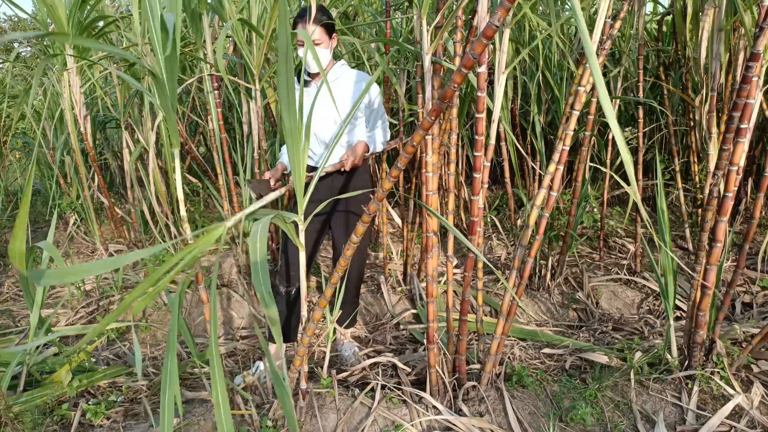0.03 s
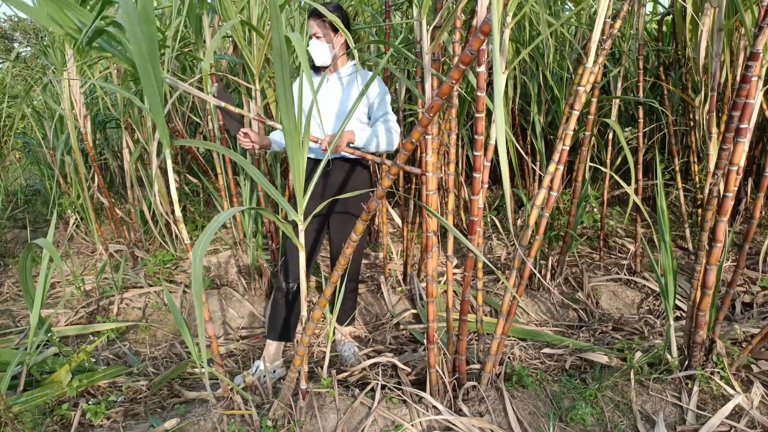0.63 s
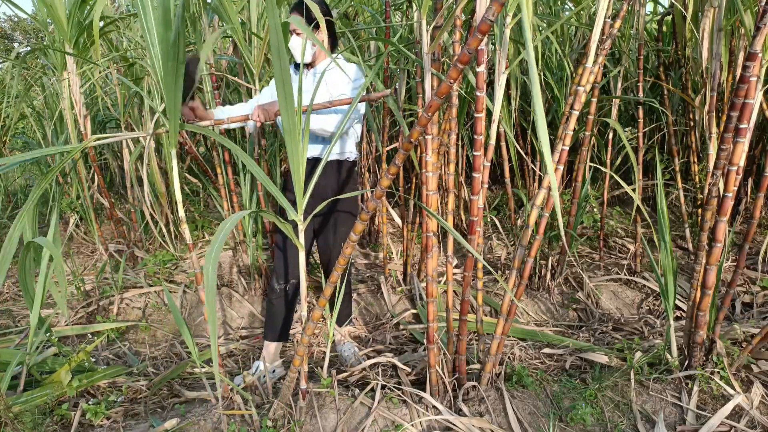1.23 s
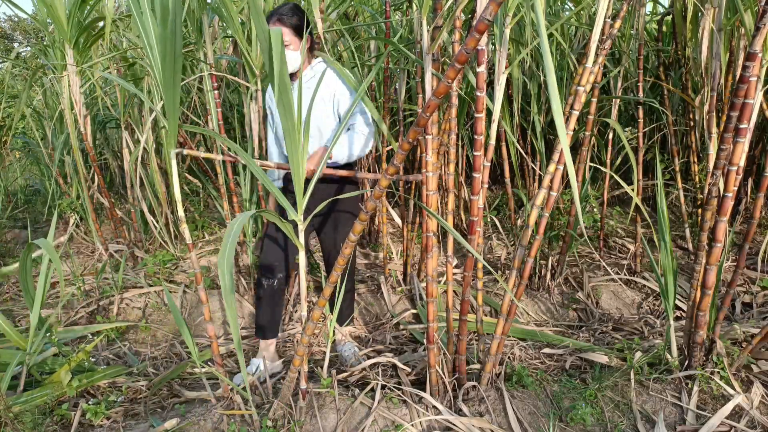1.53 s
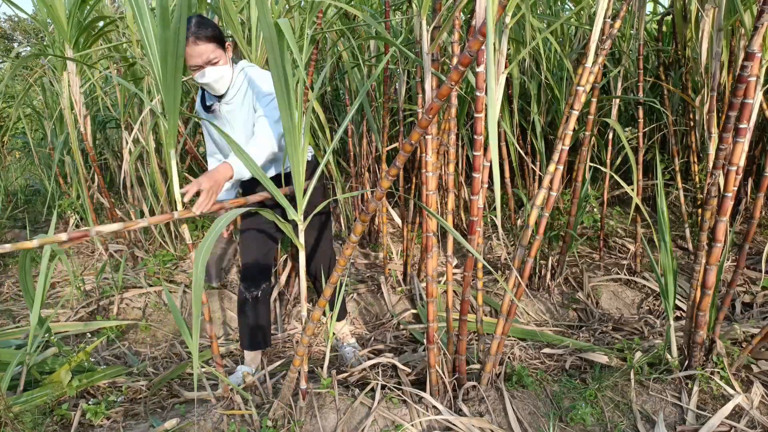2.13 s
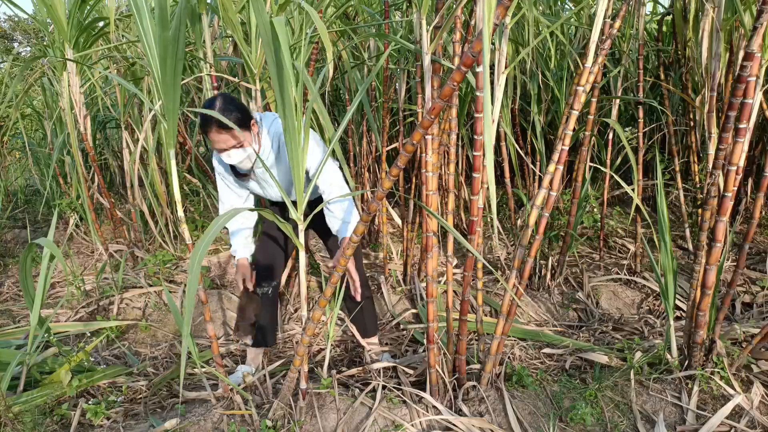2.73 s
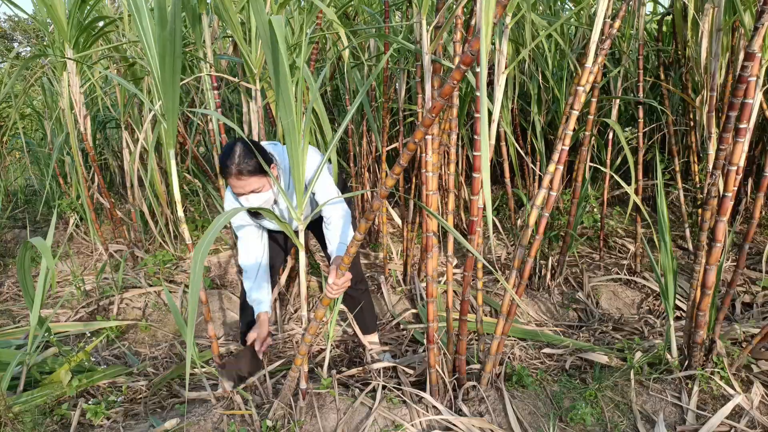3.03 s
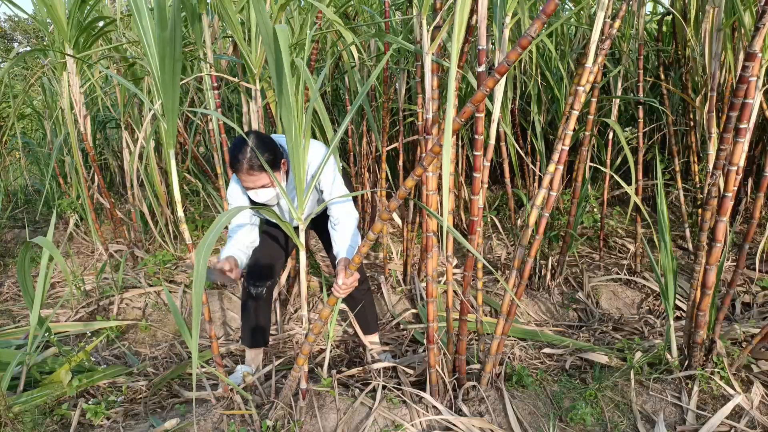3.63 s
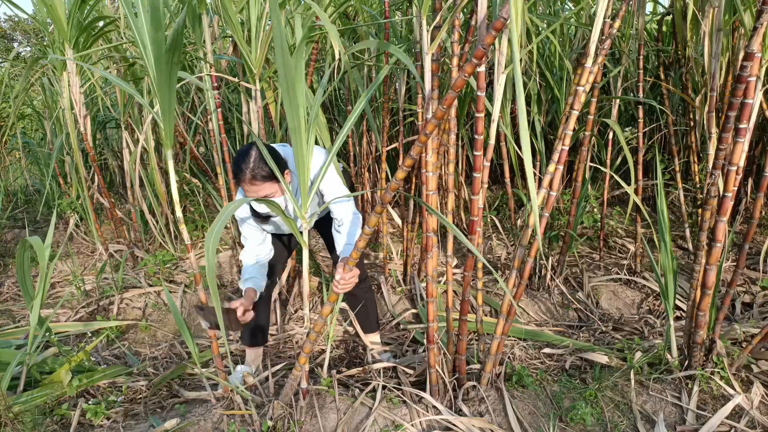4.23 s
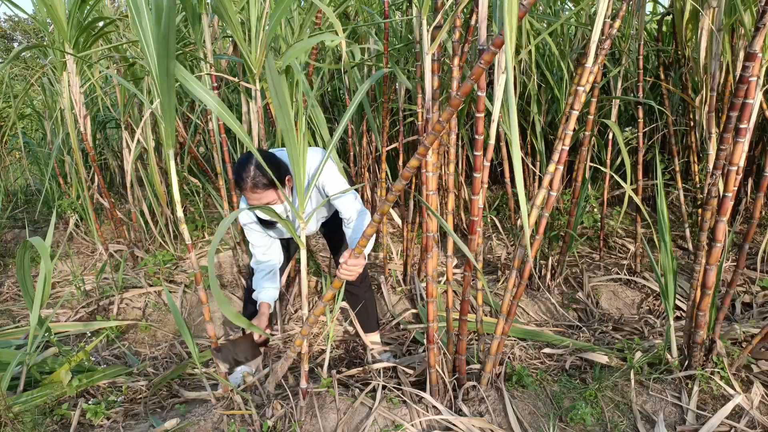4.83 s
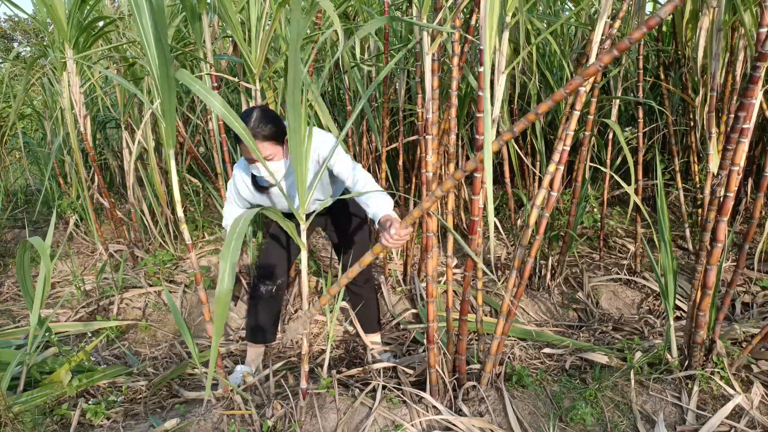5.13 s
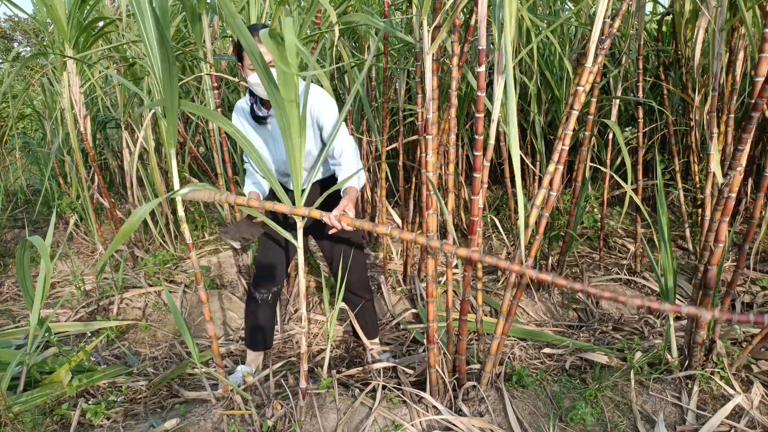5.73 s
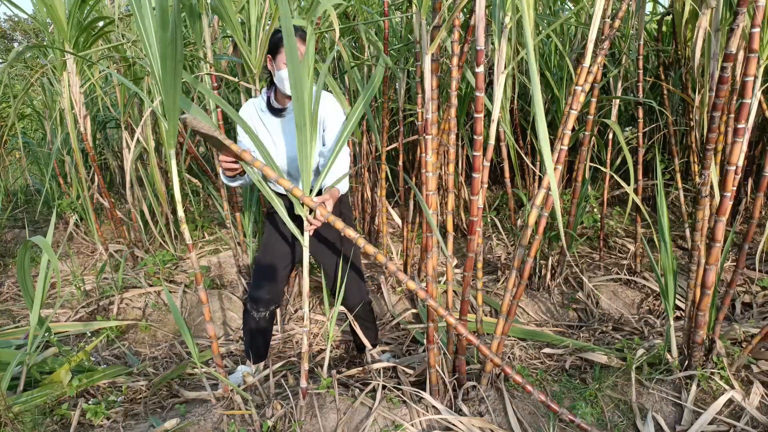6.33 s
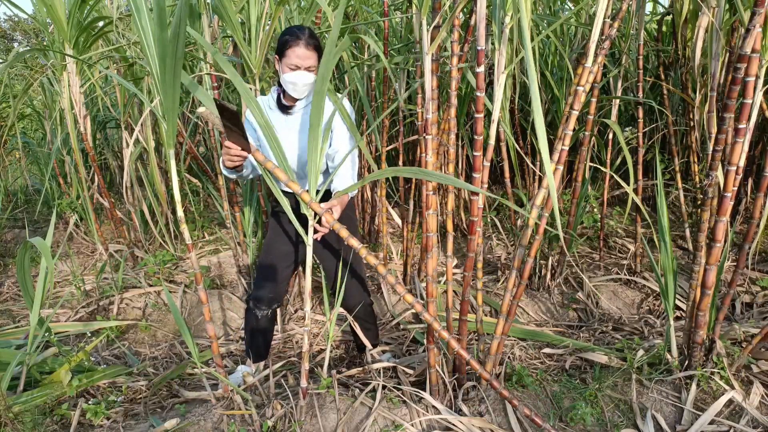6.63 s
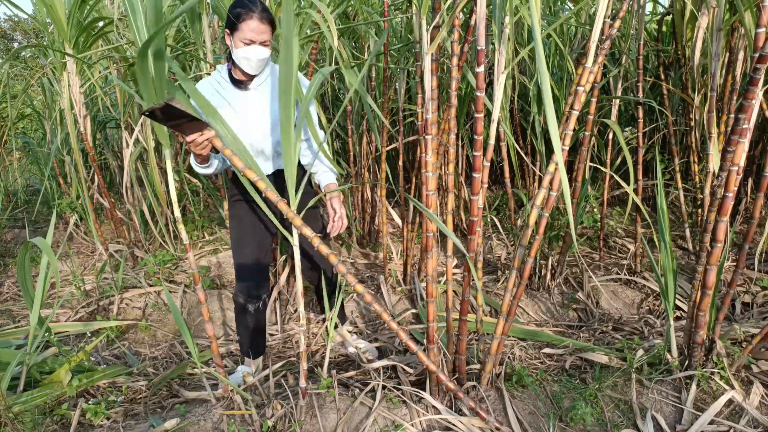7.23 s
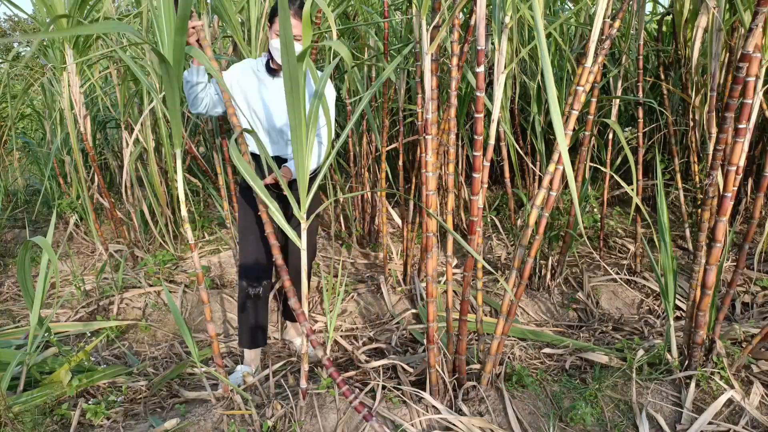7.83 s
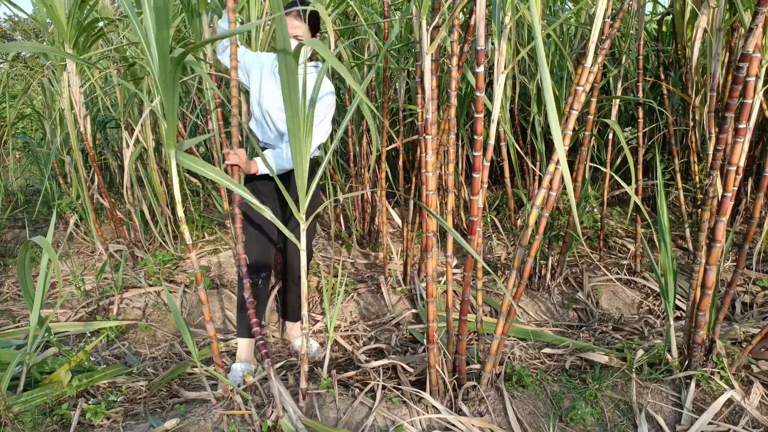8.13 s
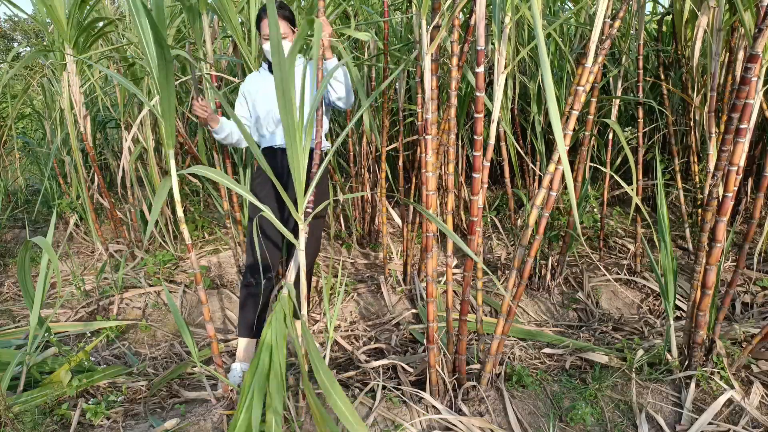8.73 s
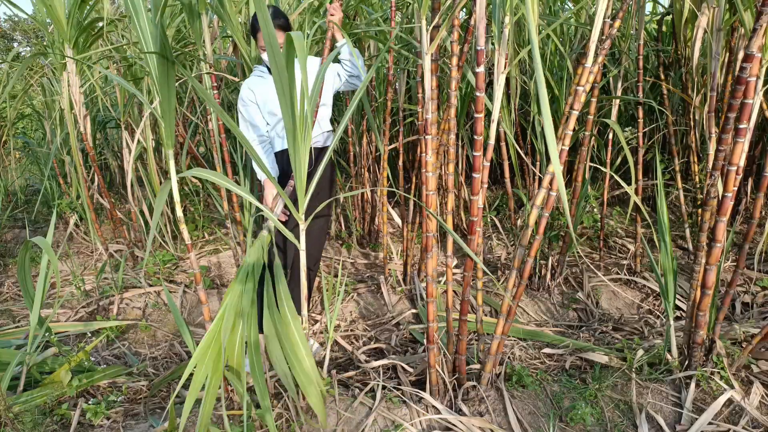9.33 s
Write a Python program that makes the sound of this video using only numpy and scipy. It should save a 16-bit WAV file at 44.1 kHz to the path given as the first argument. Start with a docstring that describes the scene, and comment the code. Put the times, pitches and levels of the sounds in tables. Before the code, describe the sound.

Sugarcane leaves rustle and snap a few metres away in an open field, starting slightly to the left. At about 1.3 seconds a cleaver cuts through a stalk with a sharp crack and a short steel ring. Near 2.6 seconds a second blow comes with a swish and knocks as a cane lands on dry litter. Three more chops follow at about 3.2, 4.1 and 4.7 seconds, snapping fibres and sounding the hollow stalk, one with a soft thud in the soil. At 6 seconds the felled cane crashes down on the right with a loud snap and a burst of leaves. It is hauled up through sliding, crackling foliage, loudest from 7.3 to 8.4 seconds, with bumps and rubbing between 8 and 9 seconds as the sound returns to the centre and eases. A light breeze continues underneath, with very faint distant bird whistles in the first four seconds.

```python
"""A cleaver cuts sugarcane a few metres away: five blows snap fibres and sound the hollow stalks.
The first takes off a leafy top and rings the blade; duller ones fell the next stalk. A cane is thrown
onto dry litter; the felled one crashes down on the right and is hauled up through sliding, snapping
leaves, bumping and rubbing. Standing canes scatter every blow; a light breeze and a far bird lie behind."""
import sys
import numpy as np
from scipy import signal
from scipy.fft import rfft, irfft, next_fast_len
from scipy.io import wavfile
from scipy.ndimage import map_coordinates

SR = 44100
rng = np.random.default_rng(int(sys.argv[2]) if len(sys.argv) > 2 else 0)


def master(y):
    """Save y as 16-bit WAV."""
    cut = np.clip(np.atleast_2d(y).T, -1, 1)
    pcm = np.round(cut * 32767)  # scale
    wavfile.write(sys.argv[1], SR, pcm.astype(np.int16))


N = 413658

# spectra of leaves and ground litter: f/Hz, density/dB
LEAF_SPECTRUM = [(900, -35), (1700, -13), (2500, -5.5), (3600, -1), (4300, -3), (5100, -8.5), (6100, -1),
                 (7000, 4), (7700, -1.5), (8800, -7), (11500, -13.5), (14000, -8), (15500, -5.5)]
LITTER_SPECTRUM = [(40, -8), (90, -10), (180, -4), (300, -2.5), (600, -2.5), (1000, -1), (1600, -1.5),
                   (3000, -2), (6000, -57)]
# their left-right coherence: f/Hz, coherence
LEAF_COHERENCE = [(1500, 0.76), (2500, 0.48), (4000, 0.23), (12000, 0.083)]
LITTER_COHERENCE = [(200, 1), (600, 0.91), (1600, 0.65), (4000, 0.16)]


def amp(db):
    """Decibels to gain."""
    return 10 ** (np.asarray(db) / 20)


def unit(x):
    """Scale to rms 1."""
    return x / np.sqrt(np.mean(x ** 2) + 1e-20)


def along(points, hz):
    """Interpolate (f/Hz, value) points on a log axis."""
    f, v = np.transpose(points)
    return np.interp(np.log(hz + 1), np.log(f + 1), v)


def hump(hz, centre_hz, width):
    """Resonance of height 1 and relative half-width."""
    return 1 / (1 + ((hz - centre_hz) / (width * centre_hz)) ** 2)


def wobble(knots_per_s):
    """Smooth random curve."""
    knots = rng.standard_normal(int(N * knots_per_s / SR) + 4)
    return map_coordinates(knots, [np.arange(N) * knots_per_s / SR])


def filtered(x, response):
    """Apply a frequency response."""
    n = x.shape[-1]
    m = next_fast_len(n + 4096)
    return irfft(rfft(x, m) * response(np.fft.rfftfreq(m, 1 / SR)), m)[..., :n]


def impulse(db_at, size=2048):
    """Minimum-phase impulse response of a dB curve."""
    cepstrum = irfft(np.log(amp(db_at(np.fft.rfftfreq(size, 1 / SR)))))
    cepstrum[1:size // 2] *= 2
    cepstrum[size // 2 + 1:] = 0
    return irfft(np.exp(rfft(cepstrum)))


def add(track, at_s, sound):
    """Mix a sound in."""
    part = track[..., round(at_s * SR):][..., :sound.shape[-1]]
    part += sound[..., :part.shape[-1]]


def panned(db):
    """Constant-power gains, left db above right."""
    gains = amp(np.array([np.atleast_1d(db), -np.atleast_1d(db)]) / 2)
    return gains / np.sqrt(np.mean(gains ** 2, axis=0))


def stereo(pair, coherence, spectrum):
    """Colour two unrelated signals and blend them into left and right, rms 1."""
    def response(hz):
        angle = np.arccos(np.clip(along(coherence, hz), -1, 1)) / 2
        return amp(along(spectrum, hz)) * [np.cos(angle), np.sin(angle)]
    mid, side = filtered(pair, response)
    return unit(np.array([mid + side, mid - side]))


def crackle(per_s, spread_db, share, size=N):
    """Two streams of uneven ticks over sliding noise; share is the ticks' part of the power."""
    sizes = amp(spread_db * np.clip(rng.standard_normal((2, size)), -2, 2))
    signs = rng.choice([-1, 1], (2, size))
    ticks = unit(sizes * signs * (rng.random((2, size)) < per_s / SR))
    return np.sqrt(share) * ticks + np.sqrt(1 - share) * rng.standard_normal((2, size))


def movement(at_s, rise_s, hold_s, fall_s):
    """Gain that swells 20 dB over the rise, holds at 1 from at_s and sinks 20 dB over the fall."""
    t = np.arange(N) / SR
    return amp(-20 * (np.maximum(at_s - t, 0) / rise_s + np.maximum(t - at_s - hold_s, 0) / fall_s))


def placed(sound, max_lag_s=0.000304):
    """Follow the cane: from the right it reaches the left later and weaker, the top octave most so."""
    # cane's path: t/s, bearing (-1 left, 1 right)
    path = [(0, -0.64), (2.0, -0.86), (3.0, -0.77), (4.5, -0.15), (5.3, 0.76), (6.1, 1), (7.0, 0.97),
            (7.7, 0.77), (8.4, -0.013), (9.3, -0.29)]
    bearing = np.interp(np.arange(N) / SR, *np.transpose(path))
    left = map_coordinates(sound[0], [np.arange(N) - bearing * max_lag_s * SR], order=5)
    pair = np.array([left, sound[1]])
    bass = filtered(pair, lambda hz: along([(1500, 0.85), (5000, 0)], hz))
    top = filtered(pair, lambda hz: along([(8000, 0.062), (11500, 0.95)], hz))
    middle = pair - bass - top
    return bass + middle * panned(-1 - 1.5 * bearing) + top * panned(-5.5 - 4.5 * bearing)


def cane_scatter(contact, body, wet_db, left_lead_s):
    """A contact arrives directly and as diffuse scatter off the canes, both coloured by the body."""
    # scatter decay: f/Hz, t60/s
    decay_times = [(150, 0.17), (800, 0.18), (3000, 0.23), (7000, 0.18), (14000, 0.27)]
    # scatter, left to right: f/Hz, coherence
    coherence = [(200, 0.94), (700, 0.87), (2000, 0.2), (8000, .05)]
    colour_db = [(150, 2.5), (500, 3.5), (2500, -0.5), (7000, -3.0), (13000, -1.2)]
    echoes = crackle(per_s=3000, spread_db=3.5, share=0.71, size=SR // 2)
    hz, t, frames = signal.stft(echoes, SR, nperseg=256)
    envelope = amp(-60 * t / along(decay_times, hz)[:, None]) * (1 - np.exp(-t / 0.004))
    tail = signal.istft(frames * envelope, SR, nperseg=256)[1]
    tail = stereo(tail, coherence, colour_db) / np.sqrt(tail.shape[1])
    padded = np.pad(contact, (0, tail.shape[1] - len(contact)))
    direct = filtered(padded, lambda hz: np.exp(1j * np.pi * hz * left_lead_s * np.array([[1], [-1]])))
    heard = signal.fftconvolve(direct + amp(wet_db) * np.linalg.norm(contact) * tail, body[None], axes=1)
    # treble leans right
    return filtered(heard, lambda hz: panned(along([(300, 0), (9000, -2.5), (14000, -6)], hz)))


def tap(colour_db, t60_s, wet_db, left_lead_s):
    """Short contact burst coloured by the thing hit; peak 1 before scatter."""
    t = np.arange(SR // 10) / SR
    contact = rng.standard_normal(len(t)) * amp(-60 * t / t60_s)
    body = impulse(colour_db)
    return cane_scatter(contact, body, wet_db, left_lead_s) / abs(signal.fftconvolve(contact, body)).max()


def breeze(level_db=-62):
    """Low, steady outdoor air."""
    # air noise: f/Hz, density/dB
    spectrum = [(12, -39), (20, 0), (70, -0.5), (192, -12.5), (235, -15.5), (300, -18.5), (449, -19),
                (910, -40), (1360, -22.5), (2500, -28), (3250, -70), (5500, -120)]
    # left to right: f/Hz, coherence
    coherence = [(25, 0.58), (100, 0.7), (300, 0.17), (1500, 0.13)]
    drift_db = 1.2 * wobble(6)
    return amp(level_db + drift_db) * stereo(rng.standard_normal((2, N)), coherence, spectrum)


def handling(still_leaf_db=-67, still_litter_db=-71.5):
    """Hiss, scrape and papery levels in dB as the cane is handled; movements add in power."""
    # movements: t/s, rise/s, hold/s, fall/s, hiss/dB, scrape/dB, papery/dB re hiss
    moves = [(0.0, .1, 0.023, 0.24, -57.5, -59.5, 2), (0.33, 0.28, 0.22, 0.61, -54, -61, 2.5),
             (1.678, 0.22, 0.19, 0.31, -55, -62, 5.5), (2.655, 0.53, 0.15, 0.26, -53, -59.5, -2.5),
             (2.95, 0.22, 0.17, 0.11, -62, -64, -4), (3.516, 0.13, 0.07, 0.48, -61, -71.5, 1),
             (4.126, 0.2, 0.048, 0.32, -56.5, -62, 4.5), (4.79, 0.27, 0.5, 0.77, -55.5, -66, 0.5),
             (5.495, 0.94, 0.37, 1.0, -51, -58, 1.5), (6.124, .15, 0.078, .25, -48, -61, 2.5),
             (6.499, 0.22, 0.033, 0.64, -50, -57.5, 0.5), (7.294, 0.32, 0.14, 0.51, -44.5, -53.5, -3.5),
             (7.63, 0.41, 0.62, 0.9, -41.5, -54, -3.5), (8.688, 0.38, 0.07, 0.72, -48.5, -59, 1),
             (9.318, 0.24, .07, .3, -55.5, -62.5, 6)]
    power = amp([[still_leaf_db], [still_litter_db], [still_leaf_db]]) ** 2 * np.ones(N)
    for *timing_s, hiss_db, scrape_db, papery_db in moves:
        power += (amp([[hiss_db], [scrape_db], [hiss_db + papery_db]]) * movement(*timing_s)) ** 2
    return 10 * np.log10(power)


def foliage(hiss_db, scrape_db, papery_db, leaf_gain_db=7.5, litter_gain_db=4.5):
    """Long leaves slide and tick over each other while the stalk scrapes through the litter."""
    # leaves catch and let go; this evens out as more of them move
    catch_db = (wobble(30) + 0.8 * wobble(110)) * amp(-0.12 * (hiss_db + 50))
    # edges flick free in 3 ms spurts
    flicks = (rng.random(N) < 25 / SR) * rng.uniform(0.3, 1.2, N)
    spurts = 1 + signal.lfilter([1], [1, -np.exp(-1 / (0.003 * SR))], flicks)
    leaves = spurts * stereo(crackle(per_s=3800, spread_db=2.5, share=0.27), LEAF_COHERENCE, LEAF_SPECTRUM)
    sheen = filtered(leaves, lambda hz: along([(8000, 0.0057), (11000, 0.81)], hz))
    papery = filtered(leaves, lambda hz: along([(4000, 0.56), (5500, 0)], hz))
    sheen_db = 0.5 + 1.05 * np.maximum(hiss_db + 46, 0)  # fast leaves are brighter
    hiss = (leaves - sheen - papery + sheen * amp(sheen_db)) * amp(hiss_db)
    hiss += papery * amp(papery_db + 2.7 * wobble(22))  # stiff dry leaves sound lower, come and go
    hiss *= amp(leaf_gain_db + 0.97 * catch_db)
    scrape = stereo(crackle(per_s=400, spread_db=4.5, share=0.27), LITTER_COHERENCE, LITTER_SPECTRUM)
    scrape *= amp(scrape_db + litter_gain_db + catch_db + 1.16 * wobble(20))
    return placed(hiss + scrape)


def bumps():
    """Feet and stalk ends knock on the ground; soft contacts are duller."""
    # contacts: t/s, level/dB, cutoff/Hz
    contacts = [(0.253, -36, 2490), (.299, -43, 2000), (2.583, -35, 700), (2.779, -36, 2500),
                (3.887, -47, 990), (5.305, -45, 900), (6.107, -38.5, 1500), (6.709, -38.5, 2000),
                (7.394, -39, 400), (8.123, -26.5, 4000), (8.227, -34, 1200), (8.304, -34.5, 700),
                (8.607, -32.5, 1316), (8.957, -32, 2570)]
    # stalk knock: f/Hz, density/dB
    spectrum = [(70, -41.5), (180, -7.5), (400, 0.5), (750, -0.5), (1300, -3.5), (3000, -1.5), (5000, 3),
                (7000, -15), (12000, -35)]
    out = np.zeros((2, N))
    for at_s, db, cutoff_hz in contacts:
        colour_db = lambda hz: along(spectrum, hz) - 10 * np.log10(1 + (hz / cutoff_hz) ** 4)
        add(out, at_s, amp(db) * tap(colour_db, t60_s=0.072, wet_db=-13, left_lead_s=0.00003))
    return out


def snaps(hiss_db, small_per_s=9.9, over_hiss_db=14.5, spread_db=3):
    """Dry leaves and fibres break to either side; small snaps follow the level of the rustle."""
    # loudest snaps: t/s, level/dB
    loud = [(.255, -23), (.299, -31), (.371, -34), (.849, -31.5), (.971, -38), (1.682, -27), (1.737, -31),
            (2.781, -21), (3.059, -28.5), (3.168, -30.5), (3.516, -36), (3.625, -33.5), (4.258, -35),
            (4.735, -23), (5.544, -26), (5.982, -13), (6.107, -25), (6.535, -32), (8.959, -27)]
    small = [(when * N / SR, hiss_db[int(when * N)] + over_hiss_db + spread_db * (2 * size - 1))
             for when, size in rng.random((round(small_per_s * N / SR), 2))]
    colour_db = lambda hz: along(LEAF_SPECTRUM, hz)
    out = np.zeros((2, N))
    for at_s, db in loud + small:
        add(out, at_s, amp(db) * tap(colour_db, t60_s=0.036, wet_db=-4, left_lead_s=rng.normal(0, 0.00012)))
    return out


def bird():
    """Faint arched whistles from far across the field."""
    # notes: t/s, length/s, top f/Hz, level/dB
    notes = [(0.675, 0.18, 1595, -69), (2.419, 0.16, 1600, -60), (3.437, 0.16, 796, -66.5),
             (3.628, 0.17, 1556, -71), (3.788, 0.12, 1640, -65)]
    out = np.zeros(N)
    for at_s, length_s, top_hz, db in notes:
        arch = np.sin(np.linspace(0, np.pi, round(length_s * SR)))
        pitch_hz = top_hz * (1 + 0.07 * (arch - 1))
        add(out, at_s, amp(db) * arch * np.sin(2 * np.pi * np.cumsum(pitch_hz) / SR))
    return out


def swishes():
    """A bunch of leaves is hit at once, then settles."""
    # hits: peak t/s, level/dB, 15 dB rise/s, t60/s, litter/dB re leaves
    hits = [(1.293, -43.5, 0.013, 0.36, -8), (1.59, -46, 0.076, 0.23, -7), (2.528, -24, 0.021, .17, -13.5),
            (2.584, -30, 0.024, 0.43, -6), (3.179, -42.5, 0.025, 0.12, -12),
            (4.682, -35, 0.026, 0.29, -6.5), (5.981, -20, .012, 0.38, -12), (6.11, -36.5, .05, 0.94, -10.5),
            (8.964, -37.5, 0.029, 0.57, -12)]
    t = np.arange(N) / SR
    leaves = stereo(crackle(per_s=1800, spread_db=1.5, share=0.87), LEAF_COHERENCE, LEAF_SPECTRUM)
    leaves *= amp(0.89 * wobble(150))
    litter = stereo(crackle(per_s=430, spread_db=4.0, share=0.41), LITTER_COHERENCE, LITTER_SPECTRUM)
    out = np.zeros((2, N))
    for at_s, db, rise_s, t60_s, litter_db in hits:
        envelope = amp(db - 15 * np.maximum(at_s - t, 0) / rise_s - 60 * np.maximum(t - at_s, 0) / t60_s)
        out += envelope * (leaves + amp(litter_db) * litter)
    return placed(out)


def chops(rise_s=0.00094, release_t60_s=0.03, uneven_db=4, gain_db=27, wet_db=-7):
    """Fibres give way within milliseconds around one main snap, exciting the stalk's hollow and rind."""
    # blows: t/s, thump/dB, knock/dB, crack/dB, splinter/dB, length/s, snap delay/s, snap/dB re fibres,
    # hollow f/Hz, hollow boost/dB, rind f/Hz, rind boost/dB, left lead/s
    blows = [(1.326, -50.5, -37, -27, -23, 0.011, .0048, 23, 604, 12, 2700, 4, 0.0002),
             (2.567, -46, -43, -33, -20.5, 0.011, .0074, 15, 480, 7, 1440, 10, 0.00027),
             (3.206, -41, -40, -34, -32, 0.004, 0.0022, 6, 527, 5, 1365, 9.5, 0.000072),
             (4.054, -38, -35, -24, -20, 0.0053, .005, 17.5, 900, 3, 2850, -1, 0.000081),
             (4.686, -31, -36.5, -27.5, -23, 0.0063, 0.0042, 22.5, 323, 11, 3700, 12, 0.000064)]
    # struck cane: f/Hz, density/dB
    spectrum = [(40, -10), (100, -8.5), (200, 3), (320, -1.5), (550, 7.5), (1000, 8), (1700, -0.5),
                (2900, -1.5), (3700, -0.5), (5000, -4.5), (7100, 13), (8800, -3.5), (11500, -11),
                (15000, -6.5)]
    edges_hz = [100, 400, 1500, 5000, 16000]  # thump, knock, crack, splinter bands
    centres_hz = np.sqrt(np.multiply(edges_hz[:-1], edges_hz[1:]))
    out, t = np.zeros((2, N)), np.arange(SR // 12) / SR
    for (at_s, *bands_db, length_s, snap_s, snap_db,
         hollow_hz, hollow_db, rind_hz, rind_db, left_lead_s) in blows:
        force = (1 - np.exp(-t / rise_s)) ** 2 * amp(-60 * np.maximum(t - length_s, 0) / release_t60_s)
        fibres = force * rng.standard_normal(len(t))
        fibres *= amp(uneven_db * np.clip(rng.standard_normal(len(t)), -2, 2))
        fibres[round(snap_s * SR)] += amp(snap_db)
        stalk = impulse(lambda hz: along(spectrum, hz) + hollow_db * hump(hz, hollow_hz, 0.17)
                        + rind_db * hump(hz, rind_hz, 0.053))
        # each blow has its own band balance
        stalk_power = abs(rfft(stalk, SR)) ** 2
        stalk_db = 10 * np.log10(np.add.reduceat(stalk_power, edges_hz)[:-1] / SR)
        balance = np.column_stack([centres_hz, bands_db - stalk_db + gain_db])
        body = signal.fftconvolve(stalk, impulse(lambda hz: along(balance, hz)))
        add(out, at_s, cane_scatter(fibres / np.linalg.norm(fibres), body, wet_db, left_lead_s))
    return out


def blade(at_s=1.330, gain_db=-33, free_s=0.15, hand_t60_s=0.5):
    """A stroke in the air leaves the steel ringing, wavering as it swings on, until the hand damps it."""
    # blade modes, the close pair near 2 kHz beating: f/Hz, level/dB, free t60/s
    modes = [(1800, -13, 0.64), (2060, -5, 0.76), (2095, -5, .4), (2305, -4, 0.16), (2895, -3.5, 0.32),
             (3817, -23, .5), (5475, -11, 0.19), (5750, -6, 0.23), (6395, -7, 0.24), (7359, 0, .15),
             (7660, 6, 0.14), (10930, -5, 0.18), (11910, -7, 0.14), (12960, -9, .18)]
    out, t = np.zeros((2, N)), np.arange(SR // 2) / SR
    envelope = (1 - np.exp(-t / 0.0027)) * amp(-60 * np.maximum(t - free_s, 0) / hand_t60_s)
    for hz, db, t60_s in modes:
        # reflections off the canes shift level and phase
        flutter_db = 3 * wobble(50)[:len(t)]
        phase = rng.uniform(0, 2 * np.pi) + 0.67 * np.array([wobble(51)[:len(t)], wobble(56)[:len(t)]])
        decay = amp(gain_db + db + flutter_db - 60 * t / t60_s)
        add(out, at_s, decay * envelope * np.sin(2 * np.pi * hz * t + phase))
    return out


def thuds():
    """The rooted stump and the falling cane push the soft ground."""
    # blows reaching the soil: t/s, level/dB
    blows = [(4.064, -32.5), (4.105, -39.5), (5.98, -40)]
    # soil: f/Hz, density/dB
    spectrum = [(30, -12), (70, -2), (130, 2.5), (190, -3), (350, -20), (1000, -55)]
    out = np.zeros((2, N))
    for at_s, db in blows:
        add(out, at_s, amp(db) * tap(lambda hz: along(spectrum, hz), t60_s=0.11, wet_db=-14, left_lead_s=0))
    return out


def rub():
    """Stalk on stalk: quick slips sound the cane's hollow midrange."""
    # rubs: t/s, rise/s, hold/s, fall/s, level/dB
    rubs = [(8.155, .08, 0.1, .06, -45.5), (8.352, 0.051, 0.026, 0.1, -44)]
    hollow_db = [(300, -34), (550, -6), (800, -1), (1100, -6), (1800, -9), (4000, -14)]
    envelope = sum(amp(db) * movement(*timing_s) for *timing_s, db in rubs)
    return envelope * stereo(crackle(per_s=270, spread_db=1, share=0.36), LITTER_COHERENCE, hollow_db)


def scene():
    """Cutting, handling and the field around them."""
    hiss_db, scrape_db, papery_db = handling()
    leaves = foliage(hiss_db, scrape_db, papery_db) + swishes() + snaps(hiss_db)
    return chops() + blade() + bumps() + thuds() + leaves + rub() + bird() + breeze()


def record(dry):
    """Brick-wall low-pass."""
    return filtered(dry, lambda hz: hz < 15950)


dry = scene()
out = record(dry)
master(out)
```